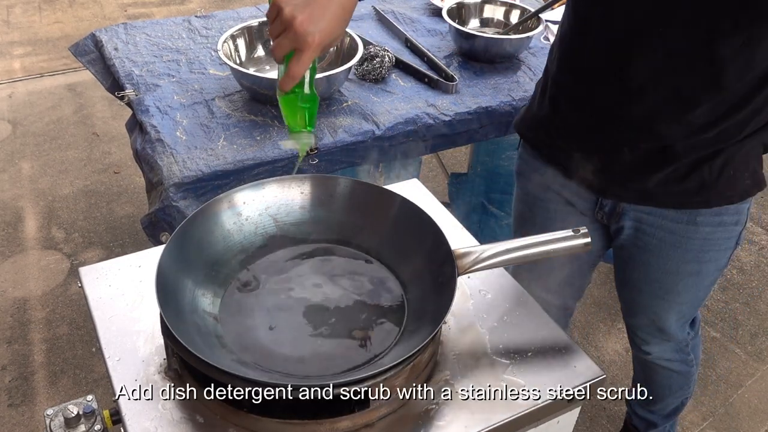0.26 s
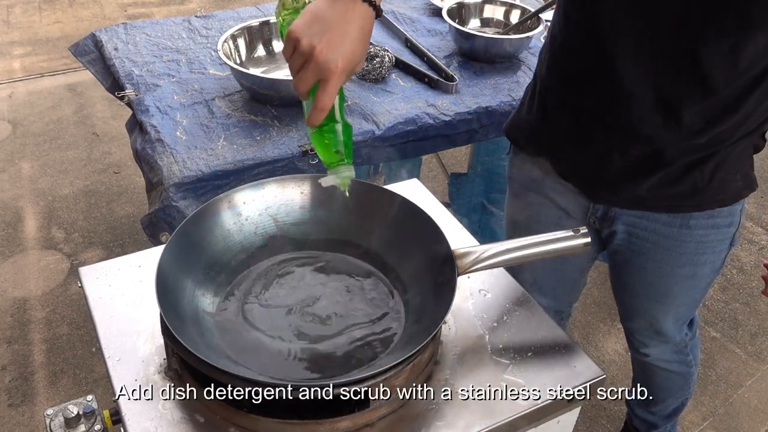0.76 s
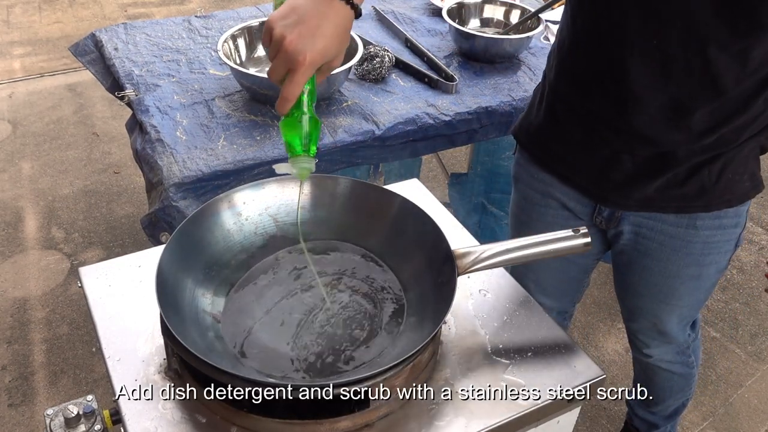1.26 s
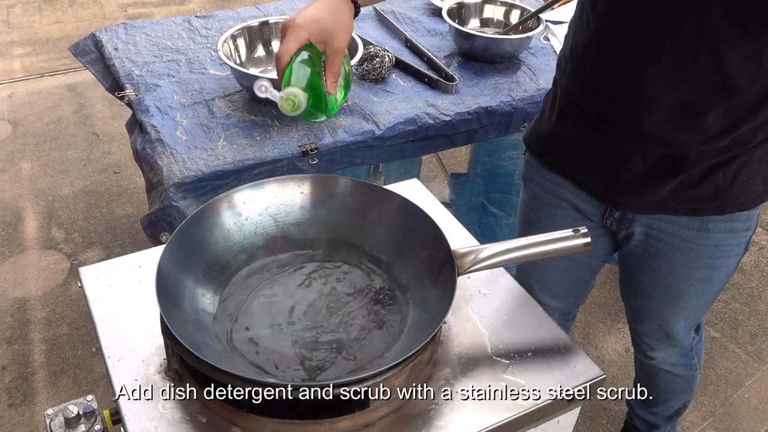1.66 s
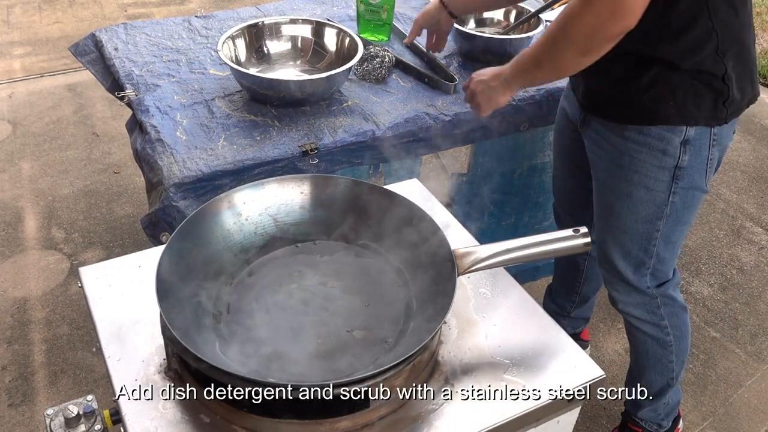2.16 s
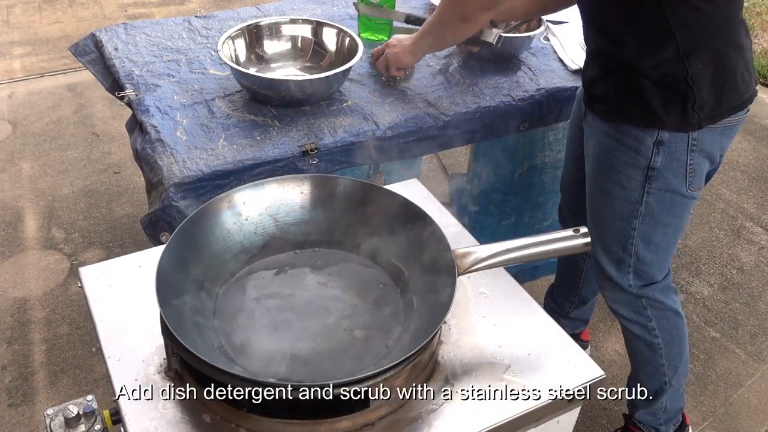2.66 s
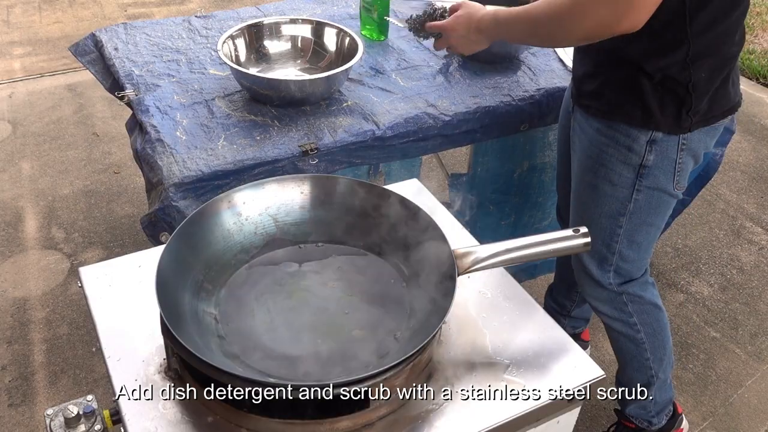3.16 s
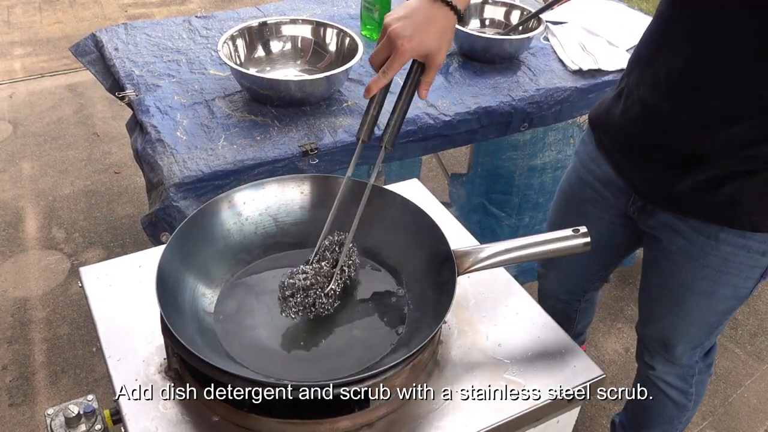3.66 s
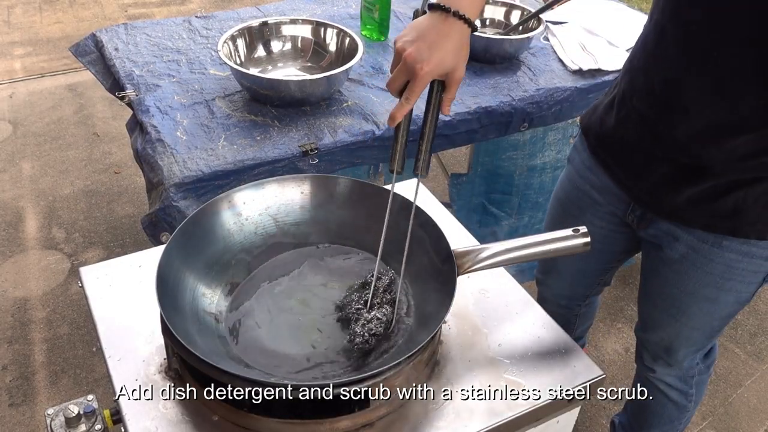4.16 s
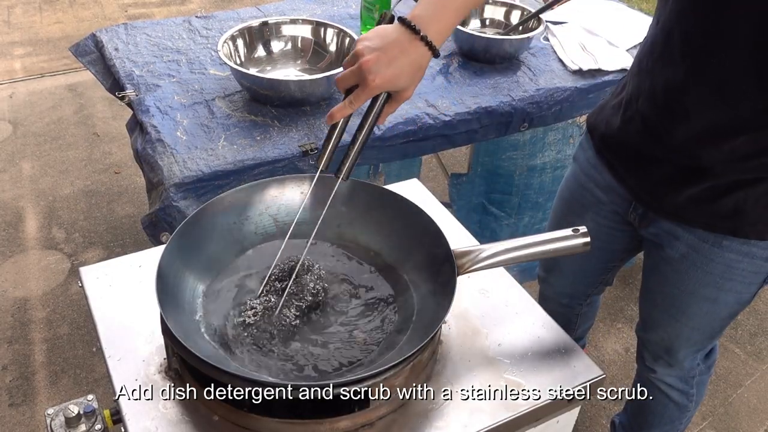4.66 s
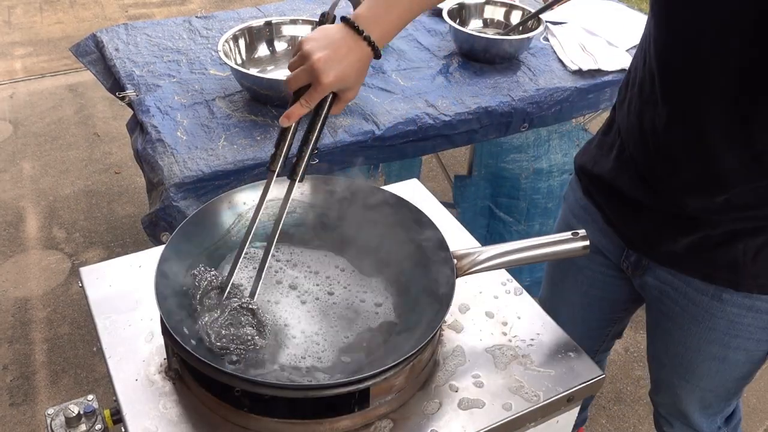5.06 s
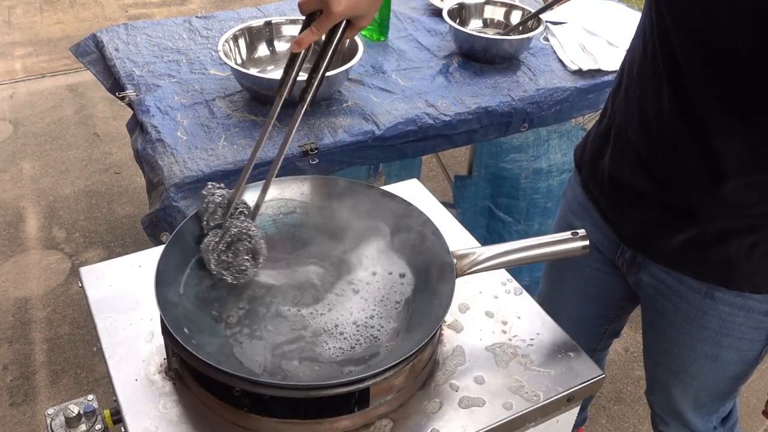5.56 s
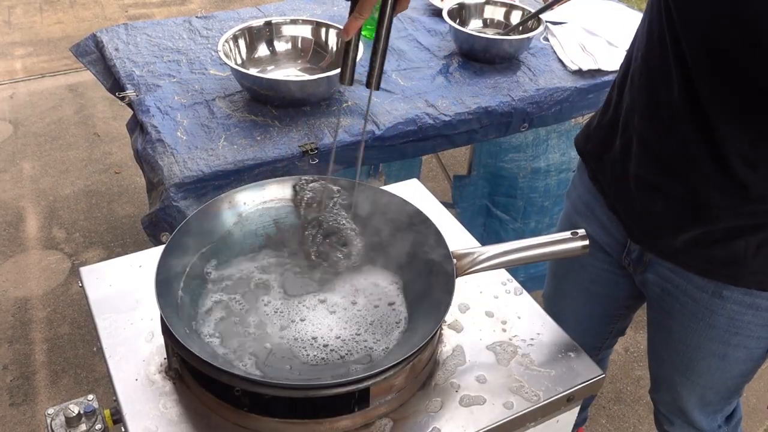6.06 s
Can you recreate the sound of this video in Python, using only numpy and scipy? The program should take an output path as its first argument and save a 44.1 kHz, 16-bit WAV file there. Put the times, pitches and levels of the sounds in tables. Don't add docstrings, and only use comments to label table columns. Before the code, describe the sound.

A wire scrubber scours a steel wok in bright, hissing, ringing strokes over a soft simmer, with tong knocks and one lid-like clank outdoors.

```python
import sys
import numpy as np
from scipy import signal
from scipy.fft import rfft, irfft, next_fast_len
from scipy.io import wavfile

SR = 44100
rng = np.random.default_rng(int(sys.argv[2]) if len(sys.argv) > 2 else 0)


def to_wav(sig):
    pcm = np.clip(np.atleast_2d(sig), -1, 1) * 32767
    pcm = np.round(pcm).astype(np.int16)
    wavfile.write(sys.argv[1], SR, pcm.T)


def how_loud(loudness_db):
    steps = np.asarray(loudness_db, float) / 20
    return 10 ** steps


N = 277830
SIZE = next_fast_len(N + SR // 2)
HZ = np.arange(1, SIZE // 2 + 2) * SR / SIZE
TOP_HZ = 15400
SECOND_CUT_S = 5.1888

# pitch_hz, left_minus_right_db
BALANCE = [(60, 0.0), (180, 0.5), (550, 0), (1650, 0.5), (4970, 0), (15000, -2.5)]
# pitch_hz, side_minus_mid_db
STEREO_WIDTH = [(60, -6), (130, -20), (290, -30), (640, -16), (1410, -11.5), (3100, -7), (6820, -2.5),
                (15000, -.5)]

# pitch_hz, level_db_per_hz
WIRE_HISS = [(1760, -35.5), (3000, -5.5), (4140, -1.5), (5020, -10), (5530, -4), (6660, -3.5),
             (13400, -8.5), (15000, -8), (15500, -10.5)]
# pitch_hz, level_db_per_hz
BOWL_SPREAD = [(88, -68), (150, -36), (287, -30), (361, -10), (677, -9), (754, -7), (840, -4.5),
               (1760, -2.5), (2000, -9), (2600, -42), (4400, -120)]
# pitch_hz, width_hz, level_over_spread_db
BOWL_MODES = [(475, 25, 3), (653, 29, 1.5), (851.5, 16, 4.5), (1147, 137, -0.5), (1456, 37, 4.5),
              (1532, 23, 4), (1676, 26, 2)]
# pitch_hz, width_hz, level_db
RIM_MODES = [(1810, 37, -1.5), (2000, 105, -2), (2211, 32, 1.5), (2380, 100, -4.5), (2506, 35, -7),
             (2570, 26, -1), (2728, 26, 2), (2985, 42, -1.5), (3335, 160, 2.5), (2380, 1630, -1)]
# pitch_hz, width_hz, level_db
TONG_MODES = [(3572, 59, 9), (3764, 70, 0), (4070, 45, 1), (4300, 20, 0), (4500, 55, -8), (4620, 58, -4),
              (4940, 44, -6), (4350, 860, -11)]
# start_s, left_lead_us, dry_wire_sheen_db, balance_db (left louder than right by
# 0.56 of it), bowl_depth_db
PAD_PATH = [(0, 25, 5.5, 2.5, 0.5), (.3, 13, 0.5, -1, 0.5), (.55, 5, 0, 1, -0.5), (1.05, 19, 0.5, 0, 0.5),
            (1.5, -19, 2, 1.5, 1), (2.0, -11, 1, 2, 0.5), (2.62, 1, -1, 1.5, 0), (2.8, 1, 5, 3, -0.5),
            (3.3, -2, 1.5, 2, -2), (3.8, 1.5, -1, -2, 2), (4.3, 4, 5.5, 2, -0.5), (4.6, 26, 0, 2.5, -0.5),
            (4.72, 28, -.5, 3, 0), (4.85, 32, 0.5, 2, -1), (5.0, 26, 2, 2.5, 0.5), (5.12, 20, -1, 2, 0.5),
            (5.18, 14.5, 2, 1, -2.5), (5.24, 5, 1, 2.5, -1.5), (5.33, 3.5, -5, 2.5, -3), (5.39, 8, 1, 3, 1),
            (5.45, 13, 4, 2, -1.5), (5.56, 12, 3, 3, 0.5), (5.7, 11.5, 1, 3, -1), (5.85, 7, 1, 3.5, -1),
            (5.97, 5, 2.5, 3, 1.5), (6.08, 3, 6.5, 3, -0.5), (6.19, 0, 3, 3, 1.5), (6.3, -2, 6, 3, 1)]
# peak_s, wire_hiss_db, swell_s, fade_s, firmness_db; swell and fade span 10 dB
FIRST_STROKES = [(0.04, -31, 0.069, 0.058, 2), (0.55, -26, 0.049, 0.053, 2.5),
                 (0.93, -40.5, 0.022, 0.066, -5), (1.05, -37, 0.068, .045, -1),
                 (1.18, -48.5, 0.094, 0.081, 6), (1.54, -30, 0.093, 0.15, 1.5),
                 (1.75, -38.5, 0.16, 0.32, 4), (2.03, -32, 0.17, 0.29, 0.5), (2.3, -37.5, 0.34, 0.3, 1.5),
                 (2.61, -31.5, 0.059, 0.089, -2), (3.25, -45.5, 0.54, 0.13, -11)]
SECOND_STROKES = [(3.33, -52, .02, .02, -8), (3.454, -49.5, 0.081, 0.031, -11),
                  (3.708, -46.5, 0.035, 0.05, 6.5), (4.09, -29.5, 0.043, 0.058, -4),
                  (4.149, -33, .05, 0.036, 0.5), (4.28, -29, 0.063, 0.059, -0.5),
                  (4.514, -37.5, 0.04, 0.12, -2.5), (4.635, -31.5, 0.022, 0.035, 1),
                  (4.69, -27.5, 0.045, 0.13, 1.5), (4.79, -27, 0.088, 0.152, -12),
                  (4.87, -25, 0.086, 0.16, 2.5), (4.978, -24.5, 0.23, 0.062, 1.5),
                  (5.09, -34.5, 0.084, 0.092, 1), (5.188, -27, 0.036, .05, 1)]
THIRD_STROKES = [(5.25, -39.5, .04, .08, 0.5), (5.35, -32, 0.09, 0.082, -1),
                 (5.398, -32, 0.055, 0.024, 0.5), (5.53, -46, 0.023, .04, -10),
                 (5.59, -39, 0.036, .04, 0.5), (5.645, -40.5, 0.028, .06, 3.5),
                 (5.71, -40, .06, 0.061, 0.5), (5.79, -43.5, 0.056, .05, -8), (5.88, -41.5, 0.075, 0.12, 3),
                 (6.015, -43.5, 0.024, .07, 2.5), (6.06, -45, .04, .05, 0), (6.11, -44.5, 0.07, 0.082, 4.5),
                 (6.25, -46, 0.042, 0.19, 2)]
# start_s, wire_hiss_db, bowl_ring_db, tong_ring_db, rim_ring_db
RESTLESS_PAD = [
    (0, -45.5, -47.5, -52, -44.5),
    (.55, -45.5, -48, -51, -45.5),
    (2.0, -46.5, -45, -51, -44.5),
    (3.32, -51.5, -58, -64, -56.5),
    (4.1, -43.5, -45.5, -46.5, -48),
    (5.19, -54.5, -50.5, -49.5, -67),
]
TONG_GRIP = [
    1.2,
    -0.8,
    2.5,
]

# start_s, level_db
SIMMER_LEVELS = [
    (0, -43.5),
    (3.319, -45),
    (5.19, -43),
]
# pitch_hz, level_db_per_hz
SIMMER_COLOUR = [(15, -76), (25, -40), (113, -22), (209, -13.5), (227, -10), (340, -6.5), (631, -2),
                 (684, -4), (782, -4), (1020, -1.5), (1660, -7), (2770, -2), (15500, -17)]
# pitch_hz, width_hz, level_over_simmer_db
BURNER_WHISTLES = [(362, 14, -1.5), (707, 35, 2), (1320, 47, 4)]
# center_s, depth_db, half_length_s
SIMMER_LULLS = [
    (3.18, -3, 0.12),
    (3.38, -2, .05),
    (5.207, -4.5, .02),
    (5.49, -3, 0.05),
    (5.79, -2, .03),
    (5.98, -2.5, 0.02),
    (6.2, 0, 0.025),
]

# pitch_hz, rms_level_db
MOTOR_TONES = [(349.9, -70.5), (699.8, -59)]
# time_s, level_db
BREEZE = [
    (0, 4),
    (.7, -0.5),
    (2.0, 4),
    (2.9, -2),
    (3.7, -3.5),
    (4.3, -1),
    (5.2, -0.5),
    (6.3, 0),
]

# start_s, level_db, center_hz, width_hz, rattle_s
WATER_SLOPS = [
    (.02, -44.5, 345, 120, 0.047),
    (0.569, -51, 352, 150, .03),
    (2.814, -33, 570, 300, 0.017),
    (3.598, -55, 330, 150, 0.07),
    (4.031, -52.5, 353, 200, 0.071),
    (4.47, -47, 500, 350, 0.078),
    (4.661, -46.5, 400, 250, 0.057),
    (5.351, -41, 544, 298, 0.06),
    (5.66, -42.5, 500, 300, 0.055),
]
# start_s, level_db, center_hz,
# width_hz, rattle_s
METAL_KNOCKS = [(0.275, -29, 4200, 1700, 0.012), (.288, -32, 4800, 1200, 0.018),
                (0.494, -27, 4300, 900, .008), (1.061, -28, 4600, 900, 0.0099),
                (2.814, -28, 1700, 2000, 0.027), (2.814, -26.5, 7560, 2200, 0.007),
                (3.327, -35, 13000, 5000, .004), (3.704, -38, 9650, 2000, 0.003),
                (3.717, -43, 1580, 150, 0.014), (3.72, -42, 820, 200, 0.01),
                (3.895, -39, 13000, 4000, .004), (4.504, -27, 4800, 2500, .004),
                (5.008, -15, 10000, 3000, .0011), (5.228, -43, 4000, 2000, .01),
                (5.628, -42, 4130, 120, 0.05), (5.808, -36, 4130, 250, .025), (5.846, -39, 4090, 170, 0.04),
                (6.164, -30.5, 2500, 3000, 0.0043), (5.999, -39, 4100, 300, .044)]
# start_s, peak_db, pitch_hz, t60_s
METAL_TICKS = [(.2752, -23, 4080, 0.016), (.2755, -27, 4900, .015), (.2797, -27, 4700, .02),
               (.2828, -24, 4100, .02), (.2838, -31, 3500, .02), (.2905, -27, 4750, .04),
               (.3005, -30, 4300, .02), (1.035, -30, 4330, .08), (1.0445, -25, 4400, .015),
               (1.0495, -23, 4330, .03), (1.0595, -24, 4300, .015), (1.0612, -20, 4420, .015),
               (1.0665, -25, 4370, .04), (1.109, -33, 3600, .02), (3.7038, -21, 9900, .007),
               (3.7043, -30, 7500, .006), (3.7085, -22, 9700, 0.007), (3.7042, -32, 3200, .02),
               (3.7087, -33, 2300, .025), (3.7115, -33, 3300, .02), (3.7185, -32, 1600, 0.05),
               (3.7215, -35, 1350, .04), (3.719, -38, 800, .05), (2.8225, -33.5, 2175, 0.42),
               (2.816, -33, 2020, .1), (2.85, -36, 2885, .12), (2.83, -40, 3290, .3),
               (2.878, -38, 1000, .08), (2.886, -35, 1254, .15), (2.819, -34, 1665, 0.45),
               (2.82, -33, 620, .08), (2.836, -34, 1400, .1), (2.8145, -27.5, 1240, .06),
               (1.08, -33, 4310, 0.16), (1.097, -32, 4330, .06), (1.0345, -32, 4800, .04),
               (1.045, -34, 5700, .08), (5.279, -28, 3000, .01), (5.885, -33, 2550, .04),
               (5.882, -31, 3500, .03), (5.64, -33, 4150, .04), (5.665, -36, 3300, .04),
               (4.99, -26, 1120, .08), (4.863, -22, 1520, .09), (4.505, -23, 4880, .012),
               (4.5105, -25, 4500, .01), (4.521, -25, 3400, .012), (4.5415, -23, 4300, .012),
               (2.601, -20, 6200, .006), (4.28, -17, 3300, .008)]
# start_s, level_db, center_hz, width_hz, rattle_s
SINGING_RUBS = [(4.835, -20, 4450, 450, .045), (4.86, -22, 2050, 300, 0.07), (5.29, -28, 4440, 600, 0.044),
                (3.9, -50, 125, 30, 0.073), (6.26, -39, 4090, 350, .07), (1.028, -31, 4500, 600, 0.023),
                (1.04, -33, 5800, 200, 0.027), (1.045, -30, 4800, 500, 0.02), (1.06, -33, 4300, 250, 0.025),
                (2.585, -33, 6160, 400, 0.04), (3.686, -42, 600, 300, 0.014), (3.704, -37, 480, 200, .01),
                (5.571, -35, 2460, 250, 0.026), (5.68, -38, 4700, 200, .03), (5.83, -41, 2750, 120, .05),
                (5.505, -41, 4630, 500, .04), (5.51, -44, 4100, 300, .04), (5.63, -38, 3600, 300, .03),
                (5.64, -40, 2500, 400, .05), (6.03, -42, 2750, 300, 0.044), (6.04, -40, 4150, 300, .05),
                (6.1, -39, 4500, 700, .04), (6.23, -41, 4700, 400, .06), (5.89, -39, 4090, 150, .035),
                (6.07, -45, 225, 24.8, 0.05), (6.25, -39, 2750, 200, 0.06), (2.635, -31, 3880, 350, .025),
                (2.575, -36, 1130, 200, .02), (4.92, -22, 2450, 400, .045), (4.88, -24, 4200, 300, .05),
                (4.94, -26, 2050, 300, .04)]

# start_s, low_modes_db, high_modes_db
CLANK_BOUNCES = [
    (2.814, -27.5, -31),
    (2.8186, -33, -26),
    (2.827, -36, -24),
    (2.833, -29.5, -29),
    (2.842, -45, -29),
    (2.85, -35, -40),
    (2.882, -46, -55),
]
# pitch_hz, level_db, t60_s
CLANK_MODES = [(994, -10, 0.15), (1040, -4.5, 0.16), (1257, -5, 0.2), (1306, -13, 0.14), (1390, -16, 0.099),
               (1650, -9, 0.12), (1530, -9, 0.1), (1870, -9, 0.2), (2065, -12, .12), (1785, -14, 0.12),
               (3510, -17, 0.32), (7015, -0.5, 0.038), (7200, -7, .035), (7700, -8, 0.018),
               (7600, -9, 0.025), (7797, -8, .035), (8160, -5, 0.035)]

# time_s, pitch_hz, level_db
GULP_PATH = [
    (3.585, 680, -69),
    (3.6, 710, -48),
    (3.62, 1027, -51),
    (3.65, 1910, -48),
    (3.69, 2630, -55),
    (3.72, 3000, -70),
]


def at_hz(points):
    hz, value = np.transpose(points)
    return np.interp(np.log(np.minimum(HZ, TOP_HZ)), np.log(hz), value)


def peak(hz, width_hz):
    return 1 / (1 + 1j * (HZ ** 2 - hz ** 2) / (HZ * width_hz))


def peaks(modes):
    return sum(how_loud(db) * peak(hz, width_hz) for hz, width_hz, db in modes)


def drift(rate_hz):
    r = np.exp(-80 * np.pi * rate_hz / SR)
    noise = rng.standard_normal(N // 40 + 2002)
    slow = signal.lfilter([1], [1, -2 * r, r * r], noise)[2000:]
    return np.interp(np.arange(N) / 40, np.arange(len(slow)), slow / slow.std())


def grains(per_s, spread_db, flicker_db):
    happens = rng.random(N) < per_s / SR
    size = happens * how_loud(spread_db * np.minimum(rng.exponential(1, N), 4))
    size = size * how_loud(flicker_db * (drift(35.0) + drift(100)))
    return size / np.sqrt(np.mean(size ** 2)) * rng.standard_normal((2, N))


def radiate(drive, response, low_hz, high_hz, width_db):
    inside = (HZ > low_hz) & (HZ < high_hz)
    response = response / np.sqrt(np.sum(np.abs(response[inside]) ** 2) / len(HZ))
    mid, side = rfft(drive, SIZE) * response
    side = side * how_loud(at_hz(STEREO_WIDTH) + width_db)
    tilt = how_loud(at_hz(BALANCE) / 2)
    return irfft(np.array([(mid + side) * tilt, (mid - side) / tilt]), SIZE)[:, :N]


def effort():
    t = np.arange(0, N + 32, 32) / SR
    edges = [0, SIMMER_LEVELS[1][0], SECOND_CUT_S, t[-1] + 1]
    start, *rest_db = np.transpose(RESTLESS_PAD)
    phase = np.searchsorted(start, t, "right") - 1
    power = np.zeros((4, len(t)))
    for moment, strokes in enumerate([FIRST_STROKES, SECOND_STROKES, THIRD_STROKES]):
        s, db, swell, fade, firm_db = np.transpose(strokes)[:, :, None]
        curve = 1.83
        shape_db = -10 * (np.abs(t - s) / np.where(t < s, swell, fade)) ** curve
        settle = np.clip((t - edges[moment]) / 0.14, 0, 1) ** 2 if moment else 1
        present = (t >= edges[moment]) * (t < edges[moment + 1])
        # dB against the wire hiss, dB per dB of firmness
        rings = [(0, 0), (-5.5, 0.86), (-3.5 + TONG_GRIP[moment], 0.64), (-3.5, 1.15)]
        for k, (ring_db, follows) in enumerate(rings):
            moving = np.sum(how_loud(db + shape_db + ring_db + follows * firm_db) ** 2, axis=0)
            resting = (how_loud(rest_db[k][phase]) * settle) ** 2
            power[k] += present * (moving + resting)
    gains = [np.interp(np.arange(N) / SR, t, np.sqrt(p)) for p in power]
    light = np.clip(how_loud(-46.0) / gains[0], 0, 1)
    return [gain * how_loud(0.67 * light * drift(26)) for gain in gains]


def wire_hiss(drive, sheen_db):
    wire = radiate(drive, how_loud(at_hz(WIRE_HISS)), 5350, 16600, width_db=-3.0)
    sheen = irfft(rfft(wire, SIZE) / (1 + (9900 / HZ) ** 6), SIZE)[:, :N]
    return wire + (how_loud(sheen_db) - 1) * sheen


def bowl_ring(firm, effort_on_bowl, depth_db):
    response = how_loud(at_hz(BOWL_SPREAD)) * (1 + peaks(BOWL_MODES))
    bowl = radiate(firm * effort_on_bowl * how_loud(depth_db - 2.5), response, 600, 2040, width_db=-0.5)
    belly = irfft(rfft(bowl, SIZE) / (1 + (HZ / 520) ** 6), SIZE)[:, :N]
    choke = np.minimum(how_loud(-43) / effort_on_bowl, 1) ** 0.34
    return bowl + (choke - 1) * belly


def rim_ring(drive):
    return radiate(drive * how_loud(-2.5), peaks(RIM_MODES) * peak(2520, 2470), 1400, 4000, width_db=-3.0)


def tong_ring(drive, depth_db):
    response = peaks(TONG_MODES) * peak(5120, 1900)
    return radiate(drive * how_loud(-1.2 * depth_db - 5.0), response, 3490, 6300, width_db=0.0)


def scouring():
    t = np.arange(N) / SR
    on_wire, on_bowl, on_tongs, on_rim = effort()
    s, *path = np.transpose(PAD_PATH)
    lead_us, sheen_db, pan_db, depth_db = [np.interp(t, s, column) for column in path]
    ticks = grains(24000, spread_db=1.5, flicker_db=0.46)
    firm = 0.69 * ticks + 0.8 * grains(12000, spread_db=1.5, flicker_db=1.27)
    pad = wire_hiss(ticks * on_wire, sheen_db) + bowl_ring(firm, on_bowl, depth_db)
    pad = pad + rim_ring(firm * on_rim) + tong_ring(firm * on_tongs, depth_db)
    half_lead = lead_us * 1e-6 * SR / 2
    pad = pad + half_lead * np.gradient(pad, axis=1) * [[1], [-1]]
    fade_in = np.where(t < SECOND_CUT_S, 1, np.minimum((t - SECOND_CUT_S) / 0.03, 1) ** 2)
    return pad * fade_in * how_loud(0.28 * np.array([pan_db, -pan_db]))


def simmer():
    t = np.arange(N) / SR
    start, level_db = np.transpose(SIMMER_LEVELS)
    moment = np.clip(np.searchsorted(start * SR, np.arange(N), "right") - 1, 0, None)
    lull_db = sum(db * np.exp(-((t - s) / half) ** 2) for s, db, half in SIMMER_LULLS)
    drive = grains(30000, 0.71, 0.242) * how_loud(level_db[moment] + lull_db + 1.0 * drift(1.9))
    response = how_loud(at_hz(SIMMER_COLOUR)) * (1 + peaks(BURNER_WHISTLES))
    return radiate(drive, response, 20, 30000, width_db=3.5)


def hum():
    t = np.arange(N) / SR
    swell_db = np.interp(t, *np.transpose(BREEZE))
    out = np.zeros(N)
    for hz, db in MOTOR_TONES:
        level = how_loud(db + swell_db + 0.7 * drift(1.2))
        out += level * np.sqrt(2) * np.sin(2 * np.pi * hz * t)
    return out


def rattles(events, rise, ending):
    out, t = np.zeros((2, N)), np.arange(12000) / SR
    for s, db, hz, width_hz, length in events:
        mid, left, right = rng.standard_normal((3, 16000))
        r, w = np.exp(-np.pi * width_hz / SR), 2 * np.pi * hz / SR
        sos = [[0.83, 0, -0.96, 1, -2 * r * np.cos(w), r * r]] * 2
        rattle = signal.sosfilt(sos, mid + 0.29 * np.array([left, right]))[:, 4000:]
        rattle = rattle / (np.abs(signal.hilbert(rattle)) / rattle.std() + 0.4) ** .5
        swell = 1 - np.exp(-t / (rise * length))
        rattle = rattle / rattle.std() * swell * np.exp(-(t / length) ** ending)
        at = int(s * SR)
        out[:, at:at + 12000] += how_loud(db) * rattle[:, :N - at]
    return signal.sosfilt(signal.butter(3, 240, "high", fs=SR, output="sos"), out)


def slops():
    return rattles(WATER_SLOPS, rise=0.47, ending=1.36)


def knocks():
    return rattles(METAL_KNOCKS, rise=0.11, ending=0.5)


def ticks_on_metal():
    out, t = np.zeros(N + 16000), np.arange(16000) / SR
    for s, db, hz, t60 in METAL_TICKS:
        landing = 1 - np.exp(-t / 0.00045)
        at = int(s * SR)
        out[at:at + 16000] += how_loud(db - 60 * t / t60) * landing * np.sin(2 * np.pi * hz * t)
    out = signal.sosfilt(signal.butter(4, 500, "high", fs=SR, output="sos"), out[:N] + 1e-18)
    return out * how_loud([[.6], [-.6]])


def rubs():
    return rattles(SINGING_RUBS, rise=0.47, ending=1.36)


def clank():
    s, low_db, high_db = np.transpose(CLANK_BOUNCES)
    chance = rng.normal(0, 1, (len(s), len(CLANK_MODES), 2))
    damped = np.exp(-np.maximum(np.arange(N) / SR - 2.844, 0) / .004)
    out = np.zeros(N)
    for (hz, db, t60), (luck, sign) in zip(CLANK_MODES, chance.transpose(1, 2, 0)):
        bounce_db, hand = (low_db, 1) if hz < 5000 else (high_db, damped)
        clicks = np.full(N, 1e-18)
        clicks[(s * SR).astype(int)] = np.sign(sign) * how_loud(bounce_db + db + 1.3 * luck)
        r, w = how_loud(-60 / (t60 * SR)), 2 * np.pi * hz / SR
        out += signal.lfilter([0, np.sin(w)], [1, -2 * r * np.cos(w), r * r], clicks) * hand
    out = signal.sosfilt(signal.butter(3, [700, 9500], "band", fs=SR, output="sos"), out)
    return out * how_loud([[.5], [-.5]])


def gulp():
    s, hz, level_db = np.transpose(GULP_PATH)
    t = np.arange(N) / SR
    pitch = np.interp(t, s, hz) * (1 + 0.021 * drift(58))
    level = how_loud(np.interp(t, s, level_db, left=-150, right=-150) + 3.0 * drift(80))
    return level * np.sin(2 * np.pi * np.cumsum(pitch) / SR)


def scene():
    water_and_air = simmer() + hum() + slops() + gulp()
    metal = knocks() + ticks_on_metal() + rubs() + clank()
    return scouring() + water_and_air + metal


def roll_off(x):
    return signal.sosfilt(signal.butter(12, 15900, fs=SR, output="sos"), x)


def record(dry):
    mix = irfft(rfft(dry, SIZE) * (HZ < 15840), SIZE)[:, :N]
    return roll_off(mix)


dry = scene()
out = record(dry)
to_wav(out)
```